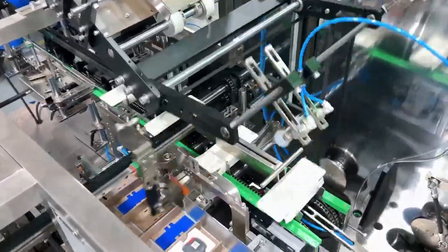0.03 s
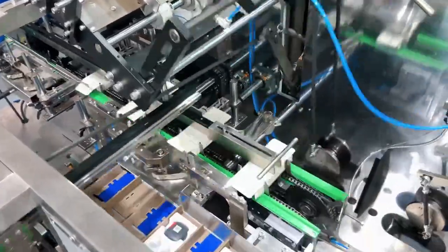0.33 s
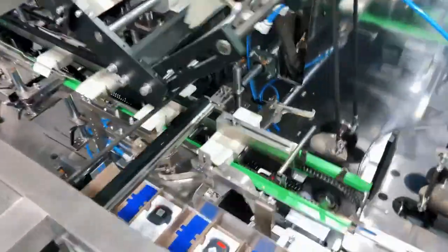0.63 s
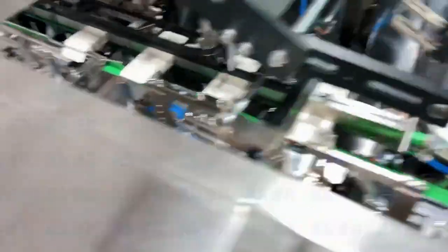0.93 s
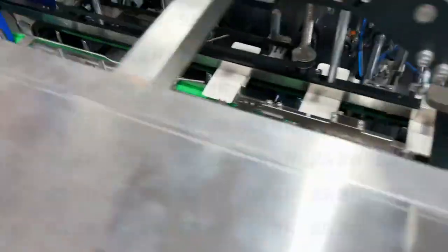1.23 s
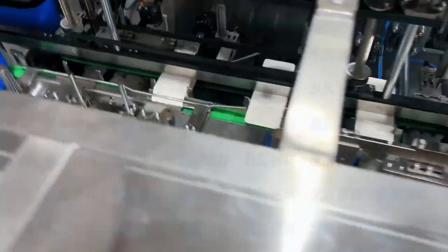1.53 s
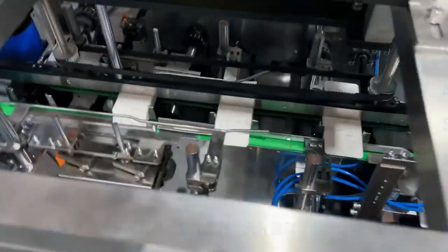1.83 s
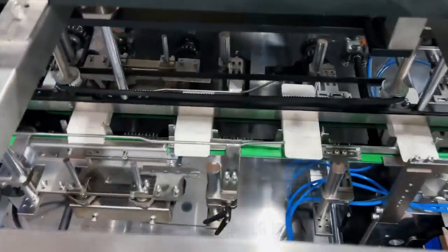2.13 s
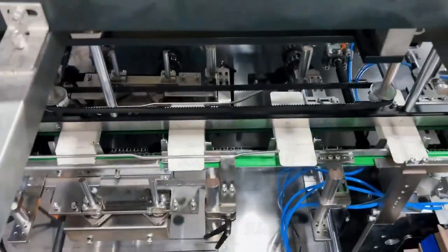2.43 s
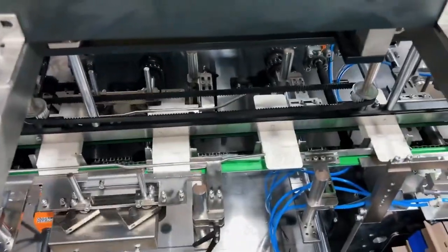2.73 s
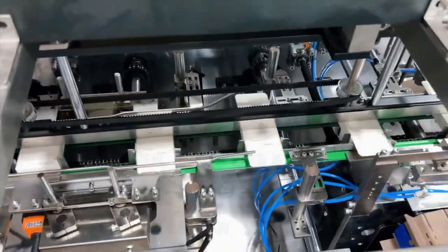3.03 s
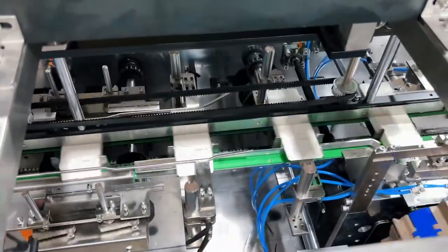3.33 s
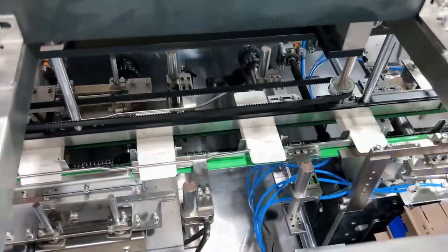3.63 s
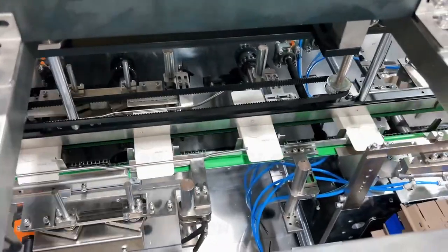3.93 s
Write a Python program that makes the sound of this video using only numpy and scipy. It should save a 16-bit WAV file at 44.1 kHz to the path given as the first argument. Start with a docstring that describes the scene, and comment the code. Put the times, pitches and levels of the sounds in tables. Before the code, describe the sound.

A packaging machine runs in a factory, chains rattling over a motor hum and low rumble. Early on, compressed air hisses for about a second. Levers then keep clacking, with clinks and dull thumps, as the microphone moves alongside.

```python
"""Along a cartoning machine

A stereo microphone pair moves along the conveyor. Chains and cams rattle in a steel housing over
a motor hum, and cartons scrape along their guides. Levers clack, rods and links clink, guides
squeak and tick, and dull thumps pass through the frame. An air valve hisses for about a second."""
import sys
import numpy as np
from scipy import signal
from scipy.fft import rfft, irfft
from scipy.io import wavfile

SR = 44100
rng = np.random.default_rng(int(sys.argv[2]) if len(sys.argv) > 2 else 0)


def wrap_up_sound(samples):
    """Save the sound to the file named by the first command line argument, as 16-bit audio."""
    columns = np.atleast_2d(samples).T
    # keep every value between -1 and 1, then stretch to whole-number steps
    tamed = np.clip(columns, -1, 1)
    steps = np.round(tamed * 32767).astype(np.int16)
    wavfile.write(sys.argv[1], SR, steps)


N = 176400
T = np.arange(N) / SR
HZ = np.fft.rfftfreq(N, 1 / SR)


def amp(db):
    """Decibels to gain."""
    return 10 ** (np.asarray(db) / 20)


def unit(x):
    """Scales to rms 1."""
    return x / np.sqrt(np.mean(x ** 2) + 1e-20)


def spectrum(points):
    """A curve over log frequency, read at every bin."""
    hz, value = np.transpose(points)
    return np.interp(np.log(HZ + 1), np.log(hz), value)


def level(points):
    """A dB curve over time, as gain."""
    return amp(np.interp(T, *np.transpose(points)))


def add(mix, start_s, sound):
    """Mixes a sound in at a time."""
    part = mix[..., max(round(start_s * SR), 0):][..., :sound.shape[-1]]
    part += sound[..., :part.shape[-1]]


def peak(hz, width_hz):
    """Gain of a resonance at every bin."""
    return 1 / (1 + ((HZ - hz) / width_hz * 1.3) ** 2)


def wander(size, span):
    """A smooth random curve of rms 1 that changes over about span steps."""
    smoothing = np.exp(-(np.fft.rfftfreq(size) * span) ** 2)
    return unit(irfft(rfft(rng.standard_normal(size)) * smoothing, size))


def rise_and_decay(t, rise_s, decay_s):
    """Envelope of a blow: a straight rise, then an exponential fall."""
    return np.minimum(t / rise_s, 1) * np.exp(-np.maximum(t - rise_s, 0) / decay_s)


# How alike the two microphones sound: (frequency [Hz], coherence [0..1])
MIC_COHERENCE = [(60, .97), (140, .92), (290, .89), (640, .62), (1250, .35), (1600, .5), (1850, .75),
                 (2500, .52), (4500, .5), (5400, .3), (6600, .72), (8600, .7), (9900, .99), (11300, .82),
                 (12900, .97), (14200, .72)]
# How far the left microphone leads: (frequency [Hz], phase [rad])
MIC_LEAD = [(20, 0), (1000, 0), (1550, -1.9), (1800, .2), (3200, 1), (4800, .3), (5600, -1.5), (6500, 0),
            (7450, -.3), (8700, -1.9), (9400, -2.9), (10200, -3.3), (12500, -6.15), (13400, -6.5),
            (15300, -9.2)]
# Lean to the left microphone: (frequency [Hz], left boost and right cut [dB])
MIC_BALANCE = [(50, 0), (130, 0.8), (500, 0.5), (1000, 0.3), (2000, 0.6), (5000, 0)]

def microphones(pair, colour):
    """Colours two unrelated signals and blends them into what the left and right microphones hear."""
    first, second = rfft(pair) * unit(colour)
    coherence = spectrum(MIC_COHERENCE)
    mid = first * np.sqrt((1 + coherence) / 2)
    side = second * np.sqrt((1 - coherence) / 2)
    lean = np.exp(.5j * spectrum(MIC_LEAD)) * amp(spectrum(MIC_BALANCE))
    return irfft([(mid + side) * lean, (mid - side) / lean], N)


def noise(colour):
    """Coloured noise of rms 1 at the microphone pair."""
    return unit(microphones(rng.standard_normal((2, N)), colour))


# Low end of the frame: (frequency [Hz], level [dB])
RUMBLE_SPECTRUM = [(15, -40), (30, -21), (45, -1), (90, 1.5), (170, -3.5), (270, -9), (450, -20),
                   (1200, -89)]
# Rumble at the microphones: (time [s], level [dB])
RUMBLE_LEVEL = [(0, -27.5), (1.4, -27.5), (1.65, -22), (1.88, -18.5), (2.05, -25), (2.45, -18.5),
                (2.88, -24.5), (3.05, -25.5), (3.4, -38), (3.7, -29), (4, -38)]

def frame_rumble():
    """The frame rumbles under everything, swelling midway."""
    return noise(amp(spectrum(RUMBLE_SPECTRUM))) * level(RUMBLE_LEVEL)


# Tones of the drive: (frequency [Hz], relative level [dB], width [Hz])
DRIVE_TONES = [(933, -40, 5), (7970, -51, 35)]
# Nearness of the drive to the microphones: (time [s], gain [dB])
DRIVE_NEARNESS = [(0, -13), (1.5, 2), (2.1, -1.5), (3.3, 3), (4, -2.5)]

def drive_whine():
    """The drive whines in narrow bands of steady pitch, louder at close range."""
    tones = sum(amp(db) * noise(peak(hz, width)) for hz, db, width in DRIVE_TONES)
    return tones * level(DRIVE_NEARNESS)


# Motor as heard along the conveyor: (time [s], level [dB])
HUM_LEVEL = [(0, -27.5), (.5, -23.5), (1.3, -24.5), (1.8, -28.5), (2.1, -33.5), (2.95, -24), (3.1, -40.5),
             (4, -32)]

def motor_hum(hz=132.5, drift=.0028, waver_db=1.5):
    """The motor hums on one wavering tone, slightly louder at the left microphone."""
    turns = np.cumsum(hz * (1 + drift * wander(N, .15 * SR))) / SR
    waver = amp(waver_db * wander(N, .09 * SR))
    hum = np.sqrt(2) * np.sin(2 * np.pi * turns) * level(HUM_LEVEL) * waver
    return hum * amp([[1], [-1]])


# Scrape on the conveyor guides: (frequency [Hz], level [dB])
SLIDE_SPECTRUM = [(600, -7.5), (2000, -8), (3500, 0), (5500, -0.5), (7000, -1), (8000, 0.5), (9500, -2),
                  (11500, 0), (12800, -2), (15500, -7.5)]
# Scrape at the microphones: (time [s], level [dB])
SLIDE_LEVEL = [(0, -21), (.04, -21.5), (.11, -32.5), (.29, -31.5), (1.43, -32), (1.54, -39.5), (1.62, -31),
               (1.71, -34), (2.0, -29), (2.36, -33.5), (2.49, -37), (2.54, -31), (2.77, -39.5), (2.8, -30),
               (2.96, -34), (3.06, -30.5), (3.18, -35), (3.27, -30), (3.48, -34), (3.6, -38), (3.89, -47),
               (4, -35.5)]

def sliding_cartons(flutter_db=2.13, ripple_db=1.4):
    """Chain and cartons scrape unevenly along their guides."""
    colour = amp(spectrum(SLIDE_SPECTRUM) + ripple_db * wander(len(HZ), 200 * N / SR))
    return noise(colour) * level(SLIDE_LEVEL) * amp(flutter_db * wander(N, .038 * SR))


# Chains and cams: (frequency [Hz], level [dB])
GEAR_SPECTRUM = [(30, -28), (100, -8.5), (250, -1.5), (370, -1.5), (500, -3.5), (850, -4), (1100, -9),
                 (1550, -9.5), (1900, -12), (2400, -15), (3200, -17), (4200, -19.5), (7000, -25.5),
                 (15000, -39)]
# Running gear as the microphones pass along it: (time [s], level [dB])
GEAR_LEVEL = [(0, -22.5), (.8, -24.5), (1.35, -24), (1.54, -25), (1.75, -23.5), (2.3, -24.5), (2.6, -25),
              (3.0, -24.5), (3.4, -23.5), (3.55, -25), (3.75, -27), (4, -26)]
# Resonances of the steel housing around it: (frequency [Hz], width [Hz], lift [dB])
HOUSING_MODES = [(269, 31, 4.5), (370, 100, 2), (574, 69, 1), (823, 134, 2), (1180, 42, 1),
                 (1520, 340, 1.5), (2980, 310, 4), (3280, 70, 1.5)]

def running_gear(knocks_per_s=260, spread_db=3.5, knock_decay_s=.0019, knock_share=.24):
    """Many small knocks of links and cams over a wash, coloured by the housing."""
    hits = rng.random(N) < knocks_per_s / SR
    strength = np.minimum(rng.exponential(1, N), 3)
    knocks = hits * amp(spread_db * strength) ** 2
    power = signal.lfilter([1], [1, -np.exp(-1 / (knock_decay_s * SR))], knocks)
    rattle = rng.standard_normal((2, N)) * np.sqrt(1 - knock_share + knock_share * power / power.mean())
    housing_db = sum(db * peak(hz, width) for hz, width, db in HOUSING_MODES)
    fine_modes_db = wander(len(HZ), 14 * N / SR)  # 1 dB ripples, about 14 Hz wide
    colour = amp(spectrum(GEAR_SPECTRUM) + housing_db + fine_modes_db)
    return microphones(rattle, colour) * level(GEAR_LEVEL)


def loose_links(per_s=105, low_hz=550, high_hz=4200, decay_s=.014, spread_db=9, against_gear_db=-12):
    """Loose links and pins jingle at random in the running gear, each at its own pitch."""
    out, t = np.zeros((2, N)), T[:4096]
    for when, pitch, strength, length, place in rng.random((round(per_s * N / SR), 5)):
        hz = low_hz + pitch * (high_hz - low_hz)
        ring = np.exp(-t / (decay_s * (.5 + length))) * np.sin(2 * np.pi * hz * t)
        angle = 2 * np.pi * place
        mid_side = np.outer([np.cos(angle), np.sin(angle)], ring)
        add(out, when * N / SR, amp(spread_db * strength) * mid_side)
    jingle = unit(microphones(out, amp(spectrum(GEAR_SPECTRUM))))
    return jingle * level(GEAR_LEVEL) * amp(against_gear_db)


# Rubs on the guides: (time [s], length [s], level [dB], pitch [Hz], scrape against squeal [dB])
GUIDE_RUBS = [(0.063, 0.022, -19.5, 12900, -1), (0.063, 0.018, -25, 12230, -6),
              (1.978, .026, -32, 12830, 5), (1.976, 0.022, -38, 7920, 0), (2.004, 0.015, -35, 7000, 3),
              (2.043, .055, -32, 12710, 0), (2.008, .095, -40, 5250, -14), (2.055, 0.06, -36, 7020, -6),
              (3.387, 0.11, -34.5, 7020, -6)]

def guide_squeaks(pitch_waver=.0055, scrape_width=.25):
    """Each brief rub gives a thin wavering squeal inside a wider scrape."""
    out = np.zeros((2, N))
    for start, length, db, hz, scrape_db in GUIDE_RUBS:
        t = np.arange(0, length, 1 / SR)
        turns = np.cumsum(hz * (1 + pitch_waver * wander(len(t), .0054 * SR))) / SR
        scrape = amp(scrape_db) * noise(peak(hz, scrape_width * hz))[:, :len(t)]
        swell = amp(db) * np.sin(np.pi * t / length)
        add(out, start, swell * (np.sin(2 * np.pi * turns) + scrape))
    return out


# Contacts on the guides: (time [s], level [dB], centre [Hz])
GUIDE_CONTACTS = [(1.81, -13, 13000), (1.812, -29, 13000), (2.374, -16, 11100), (2.542, -29, 14000),
                  (3.231, -19, 14000), (3.3567, -6, 12500), (3.3585, -21, 13500)]

def guide_ticks(decay_s=.0012, width_hz=3800, tail_s=.005, tail_db=-30):
    """Tiny hard contacts give very bright ticks with a faint tail."""
    out, t = np.zeros((2, N)), T[:2048]
    envelope = np.exp(-t / decay_s) + amp(tail_db) * np.exp(-t / tail_s)
    for start, db, hz in GUIDE_CONTACTS:
        add(out, start, amp(db) * envelope * noise(peak(hz, width_hz))[:, :len(t)])
    return out


# Dull blows on the frame: (time [s], level [dB], settled pitch [Hz], decay [s])
FRAME_BLOWS = [(0.02, -15, 184, 0.0096), (0.2, -15, 109, 0.0089), (0.966, -12.5, 240, 0.014),
               (1.457, -11.5, 253, 0.0052), (1.6, -12.5, 132, 0.033), (1.812, -7, 125, 0.0051),
               (1.856, -11.5, 250, 0.015), (1.872, -10, 92, 0.015), (1.895, -9, 89, 0.011),
               (2.214, -11.5, 94, 0.01), (2.278, -12.5, 137.6, 0.03), (2.375, -3.5, 224, 0.0019),
               (2.433, -5, 118, 0.012), (2.485, -11.5, 226, 0.0062), (2.501, -3, 90.5, 0.0056),
               (2.531, -16.5, 226, 0.0055), (2.58, -12, 70, 0.012), (2.595, -6, 146, 0.015),
               (2.732, -17, 149, 0.025), (2.811, -6.5, 330, 0.0012), (2.8173, 0.5, 101, 0.0027),
               (2.838, -10.5, 60, .032), (2.947, -11.5, 133, 0.023), (2.984, -12.5, 153, 0.008),
               (3.099, -12, 250, 0.0032), (3.644, -19, 385, 0.015), (3.652, -11, 234, 0.0087),
               (3.654, -11.5, 143, 0.019), (3.767, -14, 320, 0.0054)]

def frame_thumps(rise_s=.0044, sag_s=.0022):
    """The frame gives heavily damped low rings whose pitch sags an octave just after the blow."""
    out, t = np.zeros(N), T[:10000]
    for start, db, hz, decay in FRAME_BLOWS:
        turns = hz * (t + sag_s * (1 - np.exp(-t / sag_s)))
        add(out, start, -amp(db) * rise_and_decay(t, rise_s, decay) * np.sin(2 * np.pi * turns))
    return out * amp([[.3], [-.3]])  # a touch left of centre


# Rods, centred between the microphones: (time [s], level [dB], pitch [Hz], decay [s])
ROD_STRIKES = [(.016, -25, 1192, 0.02), (.762, -20, 1480, 0.022), (.764, -17, 1660, .012),
               (.765, -21, 2250, 0.011), (1.366, -29, 1042, 0.019), (2.179, -23, 1376, 0.025),
               (2.18, -23, 3400, 0.011), (3.381, -31, 1790, 0.031), (3.567, -20.5, 1235, 0.022)]

def rod_clinks(overtone_ratio=1.4, overtone_db=-16):
    """Struck steel rods ring briefly with one tone and a weaker overtone."""
    out, t = np.zeros(N), T[:10000]
    for start, db, hz, decay in ROD_STRIKES:
        phase = 2 * np.pi * hz * t
        ring = np.sin(phase) + amp(overtone_db) * np.sin(overtone_ratio * phase)
        add(out, start, amp(db) * np.exp(-t / decay) * ring)
    return out


# Resonances of the levers: (frequency [Hz], width [Hz], relative level [dB])
LEVER_MODES = [(284, 82, -9), (590, 180, 8.5), (900, 430, 8.5), (1426, 230, 8.5), (1770, 150, 0),
               (2300, 430, 7), (3180, 560, 9.5), (4920, 1300, 3.5), (11000, 5500, -15)]
# Levers and folders landing along the line:
# (time [s], level [dB], rise [s], decay [s], centre [Hz], spread [octaves], strike lift [dB])
LEVER_LANDINGS = [(.012, -20.5, .0032, 0.031, 1290, .41, 4), (.3068, -17, 0.00097, 0.0094, 715, .5, 11),
                  (.522, -25, .002, 0.061, 1390, .79, 9), (.713, -19.5, 0.0027, 0.04, 1010, 0.75, 3),
                  (.759, -16, .004, .012, 1760, 0.48, 11), (.792, -22.5, 0.0019, 0.011, 1750, 0.21, 8),
                  (.809, -21, 0.0013, 0.0088, 1800, 0.82, 6), (.824, -20.5, 0.0016, 0.006, 1510, 2.1, 4),
                  (0.893, -22, 0.0021, 0.0089, 1510, .35, 3), (0.9608, -13, 0.0066, 0.013, 1190, 2.8, 2),
                  (1.364, -20.5, 0.00088, 0.0066, 1200, 0.83, 2), (1.44, -24.5, 0.012, .018, 6000, 1.5, 3),
                  (1.6982, -13.5, 0.00058, 0.002, 1000, .52, 5),
                  (1.957, -21.5, 0.0049, 0.015, 1200, 0.94, 9), (2.143, -19, 0.0036, 0.024, 1120, 0.45, 8),
                  (2.172, -20, 0.0076, 0.018, 3200, 0.55, -1), (2.208, -26, .002, 0.022, 2400, 0.69, 6),
                  (2.3, -26, .004, 0.03, 1500, .8, 1), (2.372, -14, 0.0039, 0.0092, 2040, 1.5, 13.5),
                  (3.065, -24, 0.0015, 0.019, 1000, 1, 6), (3.225, -23, 0.0017, .012, 750, 0.63, 11),
                  (3.264, -22.5, 0.0022, 0.011, 1000, .8, 8), (3.374, -25.5, .007, .016, 1810, 0.33, 1)]

def lever_clacks(chatter_db=1.0):
    """Each lever lands with one hard strike inside a chatter of contacts; both ring its short modes."""
    out, t = np.zeros((2, N)), T[:8192]
    modes = sum(amp(db) * peak(hz, width) for hz, width, db in LEVER_MODES)
    for start, db, rise, decay, centre, spread, strike_db in LEVER_LANDINGS:
        focus = 1 / (1 + (np.log2((HZ + 1) / centre) / spread) ** 2)  # the band this landing excites
        flutter = unit(amp(-chatter_db * wander(len(t), .00059 * SR)))
        chatter = flutter * noise(modes * focus)[:, :len(t)]
        add(out, start, amp(db) * rise_and_decay(t, rise, decay) * chatter)
        ring = np.zeros(len(t))
        for hz, width, mode_db in LEVER_MODES:
            gain = amp(mode_db) * np.interp(hz, HZ, focus)
            ring += gain * np.exp(-np.pi * width * t) * np.sin(2 * np.pi * hz * t)
        add(out, start + rise, amp(db + strike_db) * ring / abs(ring).max())
    return out


# Compressed air leaving the valve: (frequency [Hz], level [dB])
JET_SPECTRUM = [(500, 1.5), (1500, -4.5), (3200, 4.5), (5500, 0.5), (7000, 3), (8200, 8.5), (9300, 3.5),
                (10800, 11.5), (12500, 10), (15500, 5.5)]
# Jet at the microphones, from opening to shutting: (time [s], level [dB])
JET_LEVEL = [(.302, -44), (.315, -18), (.45, -22), (.57, -20), (.69, -23), (.77, -19.5), (.87, -24),
             (.97, -21.5), (1.15, -23), (1.36, -26.5), (1.46, -24), (1.5, -38)]
# Top treble of the jet: (time [s], lift [dB])
JET_TREBLE = [(.3, 0), (.55, 0.5), (.75, -2), (.87, 2.5), (1.15, 3), (1.3, 1), (1.46, -1)]

def air_valve(flutter_db=.7, ripple_db=.3, treble_hz=9800):
    """A valve snaps open and a jet hisses until it shuts, brightest in its second half."""
    jet = noise(amp(spectrum(JET_SPECTRUM) + ripple_db * wander(len(HZ), 300 * N / SR)))
    treble = irfft(rfft(jet) / (1 + (treble_hz / (HZ + 1)) ** 20), N)
    hiss = jet + treble * (level(JET_TREBLE) - 1)
    is_open = (T > JET_LEVEL[0][0]) & (T < JET_LEVEL[-1][0])
    flutter = amp(flutter_db * wander(N, .042 * SR))
    return hiss * level(JET_LEVEL) * is_open * flutter


def scene():
    """The whole machine, heard from beside the conveyor."""
    bed = running_gear() + loose_links() + motor_hum() + drive_whine() + frame_rumble()
    bed += sliding_cartons()
    events = air_valve() + lever_clacks() + rod_clinks() + frame_thumps()
    return bed + events + guide_ticks() + guide_squeaks()


def record(dry):
    """The recorder passes sound up to 15450 Hz."""
    lowpass = signal.firwin(401, 15450, window=("kaiser", 9), fs=SR)
    return signal.oaconvolve(dry, lowpass[None], "same")


dry = scene()
out = record(dry)
wrap_up_sound(out)
```